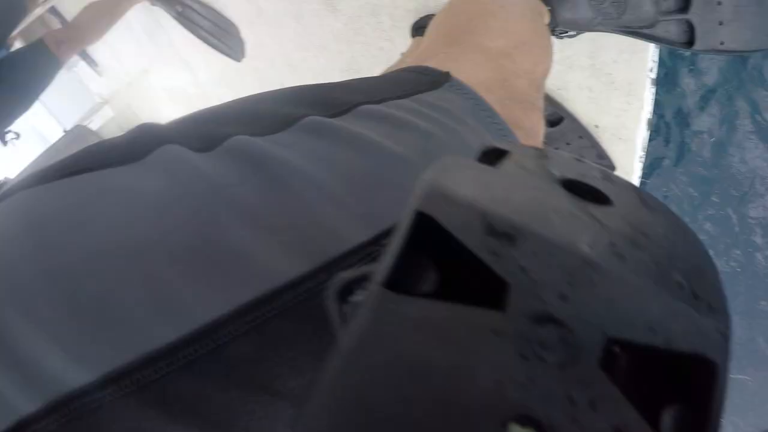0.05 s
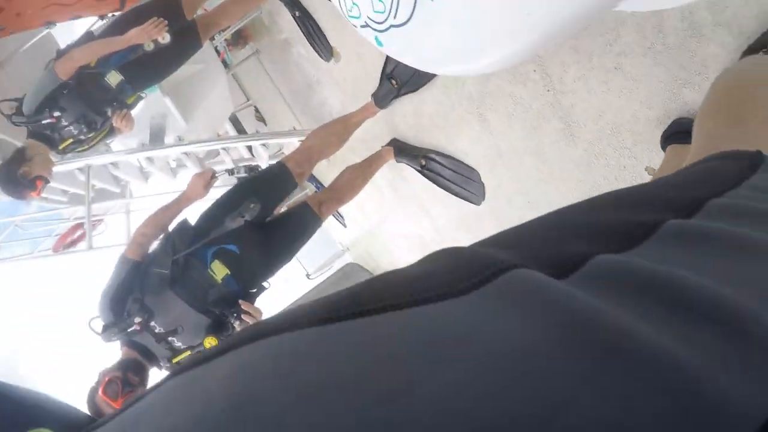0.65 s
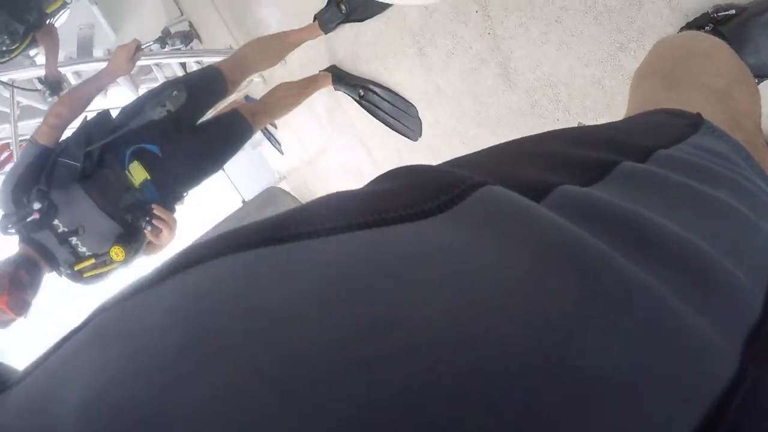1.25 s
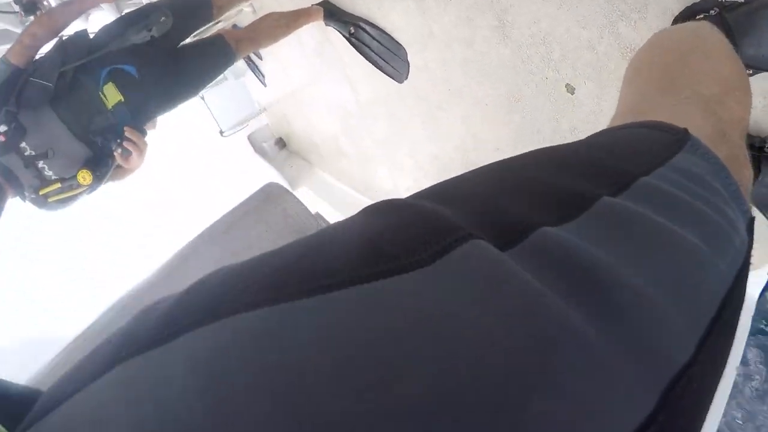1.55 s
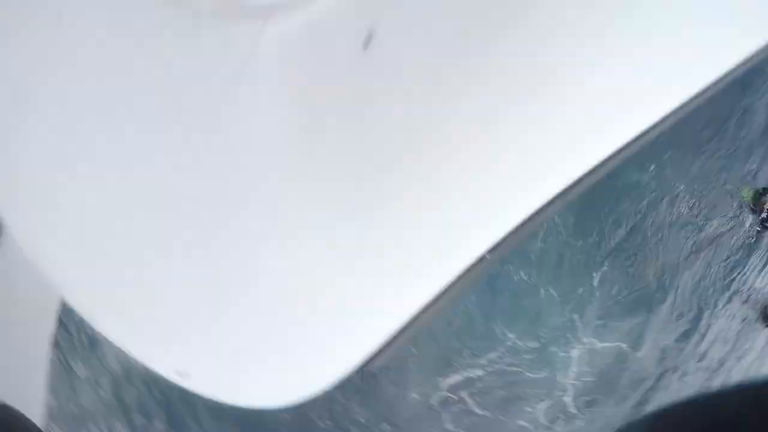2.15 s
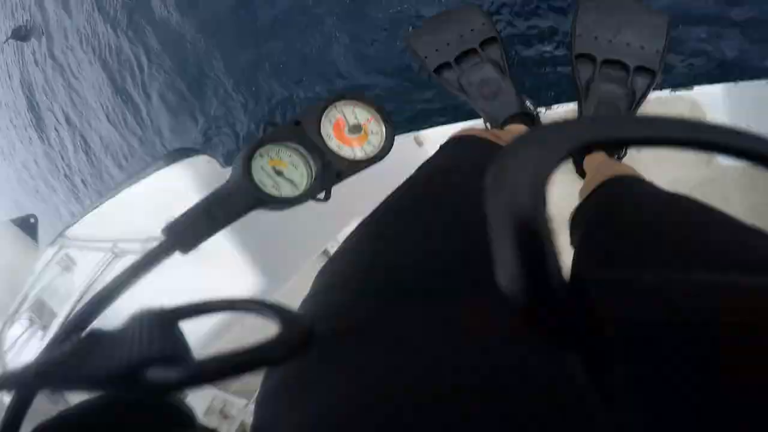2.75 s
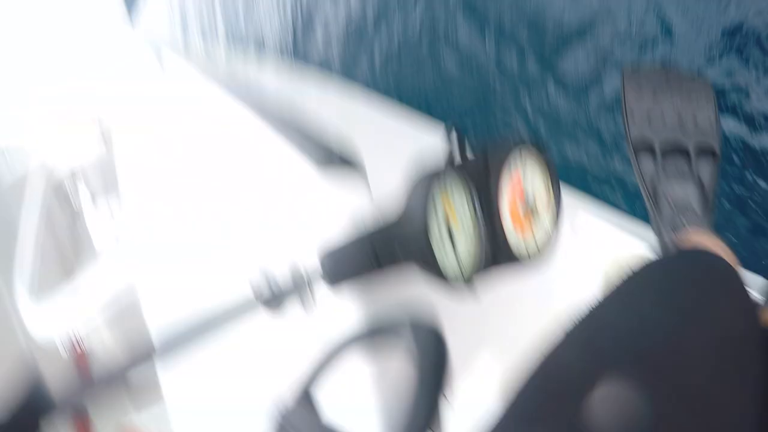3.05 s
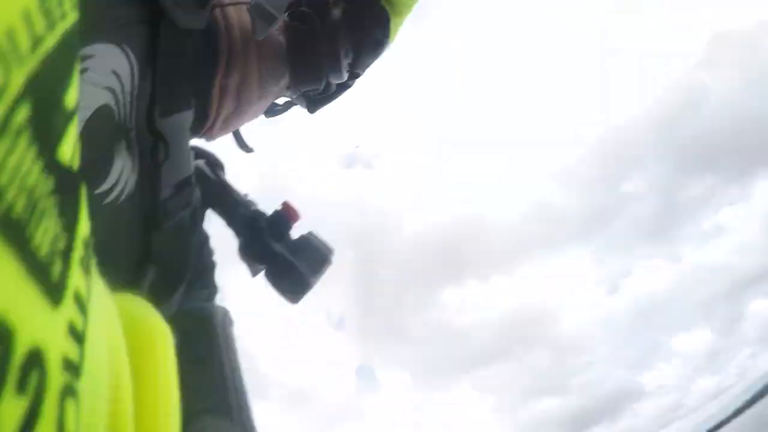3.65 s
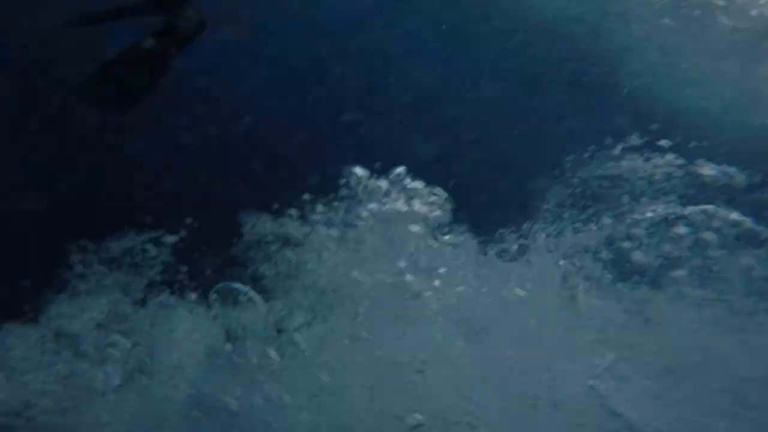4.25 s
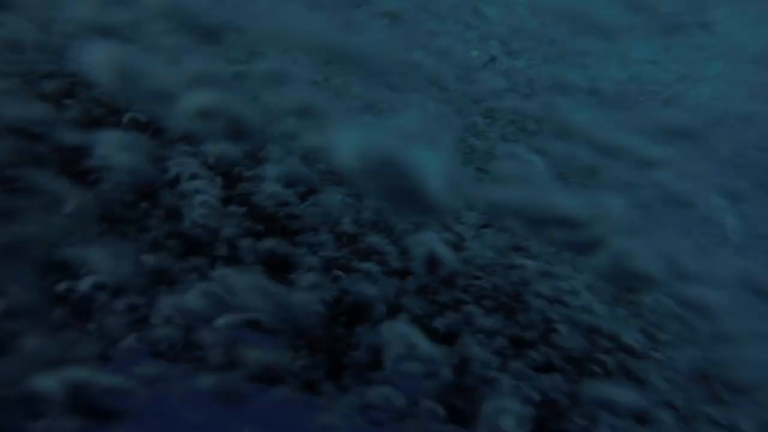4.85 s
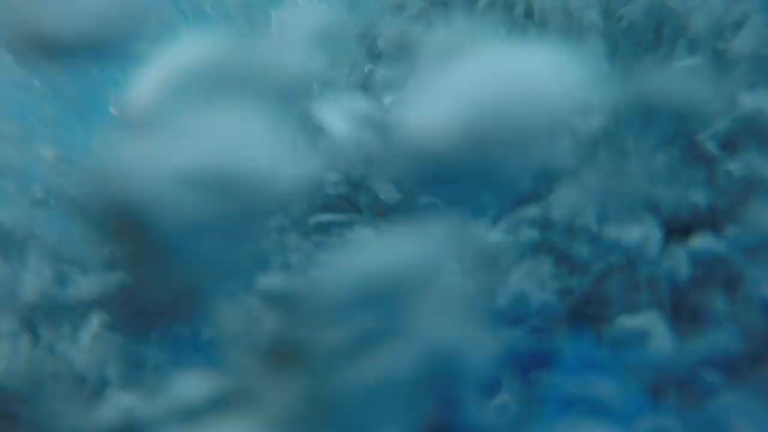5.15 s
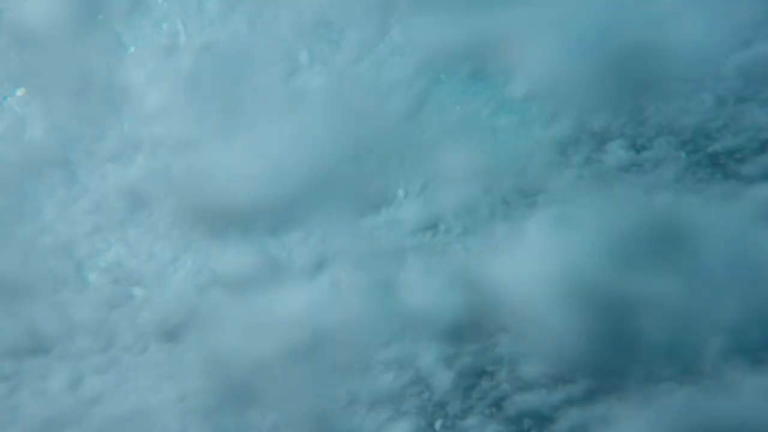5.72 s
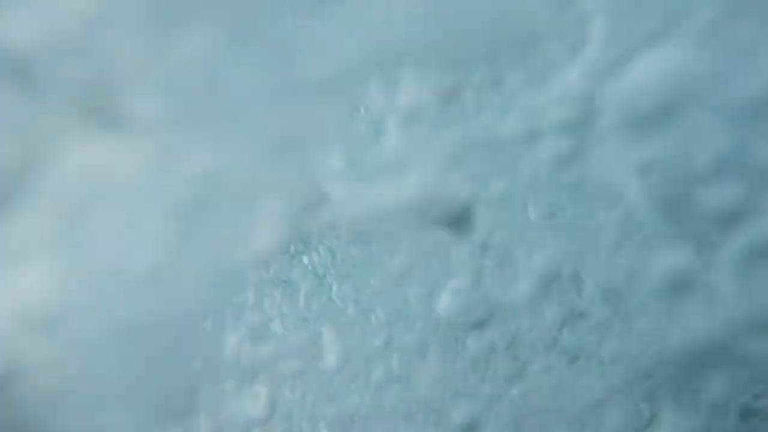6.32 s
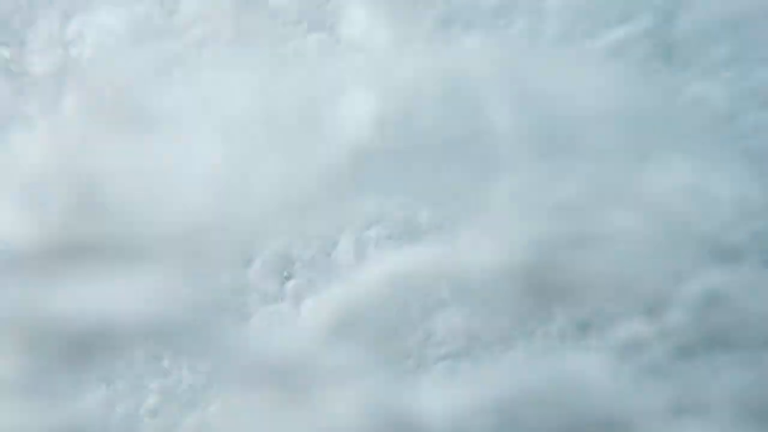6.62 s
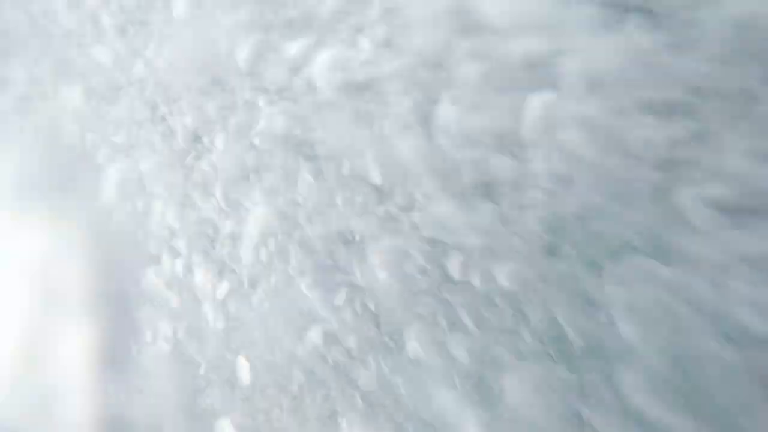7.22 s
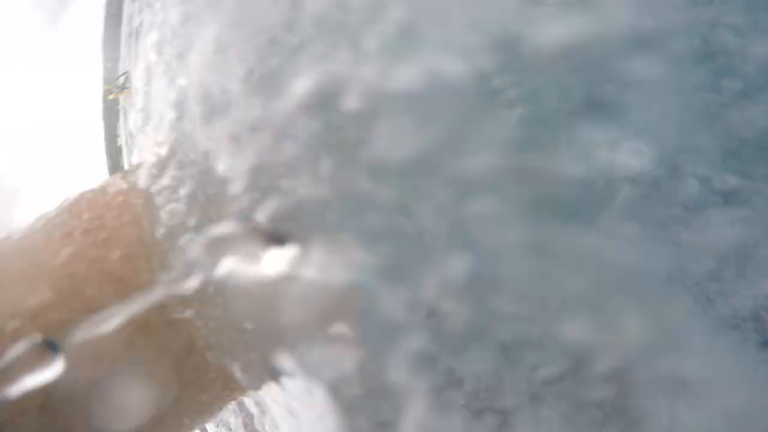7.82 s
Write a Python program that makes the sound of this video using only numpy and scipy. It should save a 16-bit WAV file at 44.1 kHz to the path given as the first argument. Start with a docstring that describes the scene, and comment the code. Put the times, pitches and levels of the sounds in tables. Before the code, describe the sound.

For the first 1.8 seconds, a wetsuit rubs against a camera's plastic housing in soft, hollow, hissing strokes that grow louder. From about 1.9 seconds, diving gear scuffs and knocks against it, with heavy low thumps around 2.1 and faint rustling in open air. More sharp clacks come irregularly from 2.7 seconds, with a brief skidding scrape near 3. At 3.9 seconds the camera slaps into the sea: a short splash, rapid knocks and deep thuds. The sound then turns muffled and quieter, a dull underwater churn with a few light clinks between 4.4 and 5 seconds. From about 5.1 seconds a dense cloud of air bubbles surrounds the housing, with low gurgles, glugs, bright plinks and fine fizz. It is strongest around 6.5 to 7.4 seconds and continues until the end near 8. Everything is very close, heard from inside the housing.

```python
"""Diver's camera entering the sea

A camera in a plastic housing rubs on a wetsuit, knocks against gear as the diver walks to the
boat's stern, then slaps into the water. Friction makes the hiss; blows ring the housing's modes.
Below the surface it is muffled, then a cloud of pulsating air bubbles churns and bursts around it."""
import sys
import numpy as np
from scipy import signal
from scipy.fft import rfft, irfft, next_fast_len
from scipy.io import wavfile
from scipy.ndimage import map_coordinates

SR = 44100
rng = np.random.default_rng(int(sys.argv[2]) if len(sys.argv) > 2 else 0)


def generate_wav(sig):
    """Save sig (samples, or channels by samples) to the path in sys.argv[1] as 16-bit PCM at SR."""
    pcm = np.round(np.clip(np.atleast_2d(sig).T, -1, 1) * 32767).astype(np.int16)
    wavfile.write(sys.argv[1], SR, pcm)


N = 347508
TIME = np.arange(N) / SR
STANDS_S, CONTACT_S, SUBMERGED_S, ENGULFED_S = 1.86, 3.906, 4.0, 5.13


def amp(db):
    """Decibels to gain."""
    return 10 ** (np.asarray(db) / 20)


def unit(x):
    """Scale to rms 1."""
    return x / np.sqrt(np.mean(x ** 2) + 1e-20)


def between(start_s, end_s, fade_s):
    """Gate with linear edges."""
    return np.clip(np.minimum(TIME - start_s, end_s - TIME) / fade_s + .5, 0, 1)


def dying(start_s, t60_s):
    """Full gain until start_s, then exponential decay."""
    return amp(-60 * np.clip((TIME - start_s) / t60_s, 0, 2))


def swells(rows):
    """Gain of bell-shaped (centre s, length s, dB) movements; powers add."""
    power = np.zeros(N)
    for centre_s, length_s, db in rows:
        near = slice(*np.searchsorted(TIME, [centre_s - 2 * length_s, centre_s + 2 * length_s]))
        power[near] += (amp(db) * np.exp(-(2 * (TIME[near] - centre_s) / length_s) ** 2)) ** 2
    return np.sqrt(power)


def wobble(rate_hz):
    """Smooth random curve, rate_hz knots a second."""
    return map_coordinates(rng.standard_normal(int(N * rate_hz / SR) + 4), [TIME * rate_hz])


def add(track, start_s, sound):
    """Mix a sound into a track."""
    part = track[round(start_s * SR):][:len(sound)]
    part += sound[:len(part)]


def filtered(x, response):
    """Apply a response given as a function of Hz."""
    size = next_fast_len(N + 8192)
    return irfft(rfft(x, size) * response(np.fft.rfftfreq(size, 1 / SR)), size)[:N]


def coloured(x, spectrum):
    """Shape by (Hz, dB) points, at rms 1."""
    points_hz, db = np.transpose(spectrum)
    return unit(filtered(x, lambda hz: amp(np.interp(np.log(hz + 1), np.log(points_hz), db))))


def noise(spectrum, grain_db=0, grain_hz=500):
    """Coloured noise, clumped by grain_db."""
    return coloured(rng.standard_normal(N) * amp(grain_db * wobble(grain_hz)), spectrum)


def resonant(x, modes):
    """Pass through (Hz, width Hz, dB) resonances, at rms 1."""
    def response(hz):
        return sum(amp(db) * 1j * hz * width_hz / (mode_hz ** 2 - hz ** 2 + 1j * hz * width_hz)
                   for mode_hz, width_hz, db in modes)
    return unit(filtered(x, response))


def ringing(modes, t, extra_db, detune):
    """One blow on (Hz, dB, t60 s) modes, at peak 1; the grip detunes them each time."""
    hz, db, t60_s = np.transpose(modes)
    hz = hz * (1 + detune * rng.standard_normal(len(hz)))
    gain = amp(db + extra_db + 2 * rng.standard_normal(len(hz))) * (-1) ** np.arange(len(hz))
    ring = gain @ (amp(-60 * t / t60_s[:, None]) * np.sin(2 * np.pi * hz[:, None] * t))
    return ring / np.abs(ring).max()


def scattered(x, share, t60_s):
    """Add brief random echoes from bubbles and the housing."""
    t = np.arange(SR // 40) / SR
    tail = rng.standard_normal(len(t)) * amp(-60 * t / t60_s)
    tail *= share / np.linalg.norm(tail)
    tail[0] += 1
    return signal.fftconvolve(x, tail)[:len(x)] / np.hypot(1, share)


def pulsation(cycle, life_cycles, rise, onset_cycles):
    """Damped sine of a bubble or thud: swells, glides up by rise, falls 60 dB in life_cycles."""
    wave = np.sin(2 * np.pi * cycle * (1 + rise * cycle / life_cycles))
    return wave * amp(-60 * cycle / life_cycles) * (1 - np.exp(-cycle / onset_cycles))


def swarm(per_s, pitch_hz, spread, life_cycles, size_db, samples):
    """Random bubbles at rms 1: log-normal pitches, many faint, a few strong."""
    when, size, damping = np.hsplit(rng.random((int(per_s * N / SR), 3)), 3)
    hz = np.clip(pitch_hz * np.exp(spread * rng.standard_normal(when.shape)), 60, 15000)
    strength = amp(size_db * np.minimum(-np.log(1 - size), 3.5))
    cycle = hz * np.arange(samples) / SR
    waves = strength * pulsation(cycle, life_cycles * (.5 + damping), rise=0.054, onset_cycles=0.66)
    at = (when * N).astype(int) + np.arange(samples)
    return unit(np.bincount(at.ravel(), waves.ravel(), N)[:N])


def around(**bubbles):
    """Six swarms around the housing, each heard by its own path."""
    return unit(sum(scattered(swarm(**bubbles), share=2.6, t60_s=0.0088) for _ in range(6)))


def deck_air():
    """Faint open air, and gear rustling as the diver shuffles to the stern."""
    # Air and rustle spectrum. Each row: frequency in Hz, density in dB.
    spectrum = [(76, -36), (130, -8), (162, -5.5), (194, -11.5), (418, -18.5), (720, -16.5), (1400, -27.5),
                (1610, -30.5), (2410, -23), (3300, -32.5), (4100, -27.5), (5100, -41.5), (6200, -37.5),
                (7600, -43), (12600, -52.5), (15100, -49.5), (16000, -78.5)]
    # Rustles. Each row: centre in seconds, length in seconds, level in dB.
    rustles = [(2.04, 0.32, -41.5), (2.3, 0.19, -48.5), (2.46, 0.067, -52), (2.56, 0.089, -46.5),
               (2.83, 0.21, -42), (3.14, .07, -57), (3.32, 0.15, -49), (3.53, 0.17, -52), (3.71, 0.22, -48),
               (3.85, 0.15, -45)]
    gain = np.hypot(swells(rustles), amp(-59.5))
    return gain * noise(spectrum, grain_db=4, grain_hz=120) * between(STANDS_S, SUBMERGED_S, 0.035)


def sway():
    """Slow pressure swings as the housing is shoved through air or water."""
    # Pressure spectrum. Each row: frequency in Hz, density in dB.
    spectrum = [(12, -4), (28, -4), (50, -6.5), (90, -11), (150, -18.5), (400, -48), (900, -110)]
    # Shoves. Each row: centre in seconds, length in seconds, level in dB.
    shoves = [(0.85, 0.036, -28), (1.02, 0.16, -44.5), (1.45, 0.21, -47.5), (1.73, 0.17, -39),
              (1.91, 0.13, -18.5), (2.06, 0.1, -11), (2.16, 0.023, -9), (2.2, .06, -25), (2.3, .12, -37),
              (2.6, 0.057, -29.5), (2.815, .08, -19.5), (2.92, 0.13, -37), (3.29, 0.048, -19.5),
              (3.375, 0.053, -23.5), (3.515, 0.054, -28.5), (3.63, 0.062, -23.5), (3.78, 0.16, -42),
              (4.04, 0.16, -11), (4.22, 0.15, -21), (4.71, 0.046, -19.5), (5.18, 0.032, -21),
              (6.3, .2, -24), (6.69, 0.056, -13), (6.98, .11, -13), (7.22, 0.089, -10.5),
              (7.36, 0.092, -19), (7.71, 0.2, -21.5)]
    seated_db, walking_db, adrift_db = -63, -45.5, -29.5
    rest_db = np.select([TIME < STANDS_S, TIME < CONTACT_S], [seated_db, walking_db], adrift_db)
    return np.hypot(swells(shoves), amp(rest_db)) * noise(spectrum)


def wetsuit():
    """Neoprene hisses over the housing and stirs the hollow between them; each stroke resizes it."""
    # Broad housing resonances under the suit. Each row: frequency in Hz, density in dB.
    spectrum = [(230, -5), (330, 2.5), (510, 3.5), (700, -5.5), (1000, -3), (1350, -7), (1800, 0),
                (2300, -12.5), (3100, -9.5), (4000, -6.5), (5100, -20.5), (7200, -17), (9000, -28),
                (13000, -28.5), (16000, -38)]
    # Strokes. Each row: centre and length in seconds, hiss and hollow in dB, hollow pitch in Hz.
    strokes = [(0.07, 0.14, -56, -73, 221), (0.333, 0.13, -52.5, -44.5, 220.3),
               (0.401, 0.035, -62, -40.5, 230.5), (0.48, 0.083, -52.5, -43, 229.6),
               (0.695, .14, -41, -31.5, 238), (0.876, 0.068, -37, -41, 202.3),
               (1.036, 0.12, -44.5, -37.5, 188.8), (1.19, 0.11, -52, -45.5, 217),
               (1.306, 0.099, -50, -58, 240.4), (1.39, 0.065, -43.5, -39.5, 255.6),
               (1.552, 0.14, -42, -33, 223.5), (1.702, 0.14, -29, -31, 245),
               (1.799, 0.073, -25.5, -32, 227)]
    creep_hiss_db, creep_hollow_db = -69, -62  # the suit never lies quite still
    centre_s, length_s, hiss_db, hollow_db, hollow_hz = np.transpose(strokes)
    phase = 2 * np.pi * np.cumsum(np.interp(TIME, centre_s, hollow_hz)) / SR
    flutter = lambda: unit(filtered(rng.standard_normal(N), lambda hz: 1 / (1 + (hz / 44) ** 3)))
    hollow = flutter() * np.cos(phase) + flutter() * np.sin(phase)
    hiss = scattered(noise(spectrum, grain_db=2.5), share=0.4, t60_s=0.014)
    hiss_gain = np.hypot(swells(zip(centre_s, length_s, hiss_db)), amp(creep_hiss_db))
    hollow_gain = np.hypot(swells(zip(centre_s, length_s, hollow_db)), amp(creep_hollow_db))
    return (hiss_gain * hiss + hollow_gain * hollow) * between(-1, STANDS_S, 0.016)


def scuffs():
    """Short gritty drags over the gear shake the housing."""
    # Friction spectrum. Each row: frequency in Hz, density in dB.
    spectrum = [(240, -34.5), (400, -1.5), (964, -3), (1530, -8), (1870, -1.5), (3210, -15.5), (3750, -10),
                (8630, -30), (12500, -36), (16000, -55.5)]
    # Drags. Each row: start in seconds, length in seconds, grit in dB, shudder in dB.
    drags = [(0.839, 0.071, -39.5, -42), (1.835, 0.055, -22.5, -19), (1.863, 0.02, -12.5, -15.5),
             (1.98, 0.15, -28.5, -20.5), (2.034, 0.026, -18.5, -17.5), (2.205, 0.0095, -42, -34),
             (2.234, 0.01, -51, -43), (2.297, 0.017, -53, -46), (2.452, .04, -61, -42.5),
             (2.329, 0.025, -44.5, -52), (2.59, 0.047, -52, -36.5), (2.759, 0.03, -36, -41.5),
             (3.284, 0.018, -40.5, -25.5), (3.488, 0.029, -46.5, -52), (3.612, 0.022, -49, -39.5)]
    grit = noise(spectrum, grain_db=3.5)
    shudder = noise([(30, -14), (70, -15), (220, 5.5), (400, -8), (800, -18), (2000, -81.5)])
    return sum(between(at_s, at_s + length_s, 0.002) * (amp(grit_db) * grit + amp(shudder_db) * shudder)
               for at_s, length_s, grit_db, shudder_db in drags)


def skid():
    """A buckle skids over the housing: stick and slip drives a few modes, hardest at the first bite."""
    start_s, length_s, slide_db, bite_db = 2.952, 0.039, -25.5, -15.5
    # Driven modes. Each row: frequency in Hz, width in Hz, gain in dB.
    modes = [(861, 250, -5), (2385, 69, 4.5), (2800, 120, -14), (3550, 174, -13.5),
             (4100, 140, -12.5), (6470, 630, -24)]
    slips = noise([(300, 0), (2500, 0), (6000, -4), (15000, -12.5)], grain_db=4, grain_hz=1400)
    pressure = np.hypot(amp(slide_db), amp(bite_db) * dying(start_s, t60_s=.04))
    return pressure * resonant(slips, modes) * between(start_s, start_s + length_s, .005)


def knocks():
    """Blows crack, thud and ring the housing, favouring modes near the contact pitch."""
    # Housing modes. Each row: frequency in Hz, gain in dB, t60 in seconds.
    modes = [(444.4, -0.5, 0.014), (648, -1.5, .02), (940, 3, 0.012), (1342, -1.5, 0.009),
             (1856, -1.5, 0.012), (1840, -31.5, .08), (2358, -1.5, 0.013), (3030, -6.5, 0.014),
             (3343, -5, 0.01), (4110, -2, 0.011), (5280, -5, .005), (6710, -4.5, 0.0033)]
    # Blows. Each row: start in seconds, relative level in dB, contact in Hz, thud and treble in dB.
    blows = [(1.883, -8, 1634, 5, -18), (1.977, -1, 830, 0.5, -50), (2.003, -9, 1690, -13, -28),
             (2.037, -4.5, 926, -20, -27), (2.148, 9, 1086, -4.5, -7.5), (2.523, -35, 3330, 1, -6),
             (2.591, -24.5, 799, -17, -47), (2.625, -30, 708, -12, -56), (2.719, -11.5, 2570, -17, -26),
             (2.805, 8, 1720, -33, -10), (2.878, 0, 3270, -24, -18), (2.941, 5.5, 2570, -34.5, -10.5),
             (3.006, -5.5, 2560, -41, -10.5), (3.09, -35.5, 698, 5, -60), (3.274, -25.5, 957, -3, -45.5),
             (3.332, 1.5, 895, -37, -9.5), (3.358, 7, 1760, -19.5, -18), (3.388, -3.5, 4300, -38, -22),
             (3.609, -30.5, 915, 3.5, -7), (3.764, 5, 1510, -24.5, -32), (3.799, -11.5, 2440, -24, -43),
             (3.868, -4, 2330, -41, -25), (3.909, -1, 1760, -33, -14), (3.935, -11.5, 2240, -7, 7),
             (3.962, -3.5, 3460, -4, -2), (3.986, -3.5, 1900, -8, -6), (4.012, -8, 1850, -7, -35),
             (4.044, 2.5, 790, -14, -16.5), (4.097, 0, 1760, -12, -23)]
    out, t = np.zeros(N), np.arange(SR // 8) / SR
    hz = np.transpose(modes)[0]
    for start_s, db, contact_hz, thud_db, treble_db in blows:
        favour_db = 8 * np.exp(-(np.log(hz / contact_hz) / 0.31) ** 2)
        body_db = 0.094 * thud_db * (hz < 1200)
        hardness_db = 0.4 * (treble_db + 17) * np.maximum(np.log2(hz / 2000), 0)
        ring = ringing(modes, t, favour_db + body_db + hardness_db, detune=.035)
        ring = scattered(ring, share=.4, t60_s=.012)
        crack = amp(treble_db - 4 - 60 * t / 0.0043) * rng.standard_normal(len(t))
        thud = amp(thud_db + 0.5) * pulsation(190 * t, life_cycles=5.3, rise=0, onset_cycles=0.064)
        add(out, start_s + .001, amp(db + 1.5) * (ring + crack + thud))  # 1 ms after the listed start
    return out


def heaves():
    """Heavy blows move the whole housing for a few low cycles."""
    # Blows. Each row: start in seconds, relative level in dB, pitch in Hz.
    blows = [(1.885, -9, 300), (1.964, -9, 324), (1.981, 0.5, 133), (2.1521, 6, 156), (2.802, -7.5, 44.7),
             (3.614, -16.5, 45.2), (4.0485, 3.5, 80), (4.101, 3.5, 84)]
    out, t = np.zeros(N), np.arange(SR // 8) / SR
    for start_s, db, hz in blows:
        add(out, start_s, amp(db + 5) * pulsation(hz * t, life_cycles=2.55, rise=0, onset_cycles=0.12))
    return out


def clinks():
    """Gear taps the submerged housing."""
    # Modes the water leaves ringing. Each row: frequency in Hz, gain in dB, t60 in seconds.
    modes = [(1790, -11.5, 0.015), (2440, -4, 0.01), (3100, 0.5, 0.011), (3560, -1, 0.0094),
             (3870, -3.5, 0.007), (4600, -20, .01), (6600, -23, 0.005)]
    # Taps. Each row: start in seconds, level in dB.
    taps = [(4.4385, -3), (4.458, -15), (4.782, -17.5), (4.9551, -4)]
    out, t = np.zeros(N), np.arange(SR // 8) / SR
    attack = 1 - np.exp(-t / 0.00013)
    for start_s, db in taps:
        add(out, start_s, amp(db) * ringing(modes, t, extra_db=0, detune=0.045) * attack)
    return out


def splash():
    """Drops spatter the housing until it is under; their foam fades more slowly."""
    # Spray spectrum. Each row: frequency in Hz, density in dB.
    spectrum = [(240, -11), (400, -7), (994, -5.5), (1250, -11.5), (1930, -1.5), (2840, -4.5), (3640, -6.5),
                (5270, -12.5), (13500, -27.5), (15300, -32), (16000, -46)]
    spray = amp(-18) * dying(SUBMERGED_S, t60_s=0.15)
    foam = amp(-32.5) * dying(SUBMERGED_S, t60_s=1.55)
    return (spray + foam) * noise(spectrum, grain_db=5, grain_hz=610) * between(CONTACT_S, 4.6, 0.0045)


def large_bubbles():
    """Large bubbles gurgle over a distant churn; the gurgle is dull until the cloud arrives."""
    # Housing response to large bubbles. Each row: frequency in Hz, gain in dB.
    response = [(35, -33), (60, -5.5), (82, -0.5), (152, -10.5), (296, -2), (470, -1), (649, 3.5), (738, 0),
                (907, -3.5), (1300, -1.5), (1690, -53), (2860, -120)]
    far_cutoff_hz = 760
    bubbles = swarm(per_s=750, pitch_hz=316, spread=0.697, life_cycles=9.8, size_db=4, samples=1800)
    near = coloured(bubbles, response)
    far = filtered(near, lambda hz: 1 / np.sqrt(1 + (hz / far_cutoff_hz) ** 10))
    engulfed = between(ENGULFED_S, 9, 0.11)
    gurgle = engulfed * near + (1 - engulfed) * far
    churn = noise([(40, -4), (85, 8.5), (140, 4), (220, 3.5), (420, -3), (640, 1.5), (850, -9.5),
                   (1400, -38), (4000, -100)], grain_db=3, grain_hz=40)
    return amp(2.5) * gurgle + amp(-2) * churn


def small_bubbles():
    """Small bubbles chirp in clusters; countless others blur into froth."""
    # Froth spectrum. Each row: frequency in Hz, density in dB.
    spectrum = [(500, -33), (900, 8.5), (1300, 0), (1800, 6.5), (2500, 0.5), (3300, -11), (5000, -17),
                (9000, -40), (15000, -51)]
    clusters = unit(amp(2.55 * wobble(45)))
    chirps = around(per_s=55, pitch_hz=2009, spread=0.421, life_cycles=23.4, size_db=5, samples=700)
    froth = noise(spectrum, grain_db=5, grain_hz=220)
    return clusters * (amp(2) * chirps + amp(-1) * froth)


def fizz():
    """The finest bubbles ping, hiss and tick, with brief echoes."""
    # Housing response to ticks. Each row: frequency in Hz, gain in dB.
    response = [(2500, -57), (4000, 12), (6000, 1.5), (9000, -3), (15000, -1)]
    pings = around(per_s=20, pitch_hz=5600, spread=.42, life_cycles=22, size_db=7.5, samples=400)
    mist = noise([(3000, -42), (5500, -3.5), (9000, -3.5), (15000, -5)], grain_db=6.5, grain_hz=320)
    tick_swarms = (swarm(per_s=40, pitch_hz=9000, spread=.4, life_cycles=6, size_db=9.5, samples=100)
                   for _ in range(4))
    ticks = sum(scattered(tick_swarm, share=0.8, t60_s=0.0026) for tick_swarm in tick_swarms)
    return amp(-1.5) * pings + amp(4.5) * coloured(ticks, response) + amp(-10) * mist


def cloud():
    """Bubbles of three sizes surround the housing; puffs of fine foam sweep over it."""
    # Cloud strength. Each row: time in seconds, large and small bubbles in relative dB.
    levels = [(4.12, -29, -36.5), (4.42, -39.5, -48), (4.8, -33.5, -43.5), (5.15, -31.5, -40.5),
              (5.36, -21.5, -38), (5.55, -27, -38), (6.25, -26, -47), (6.45, -23, -40.5), (6.8, -21, -38.5),
              (7.0, -22.5, -32), (7.3, -22, -30.5), (7.53, -35, -35.5), (7.88, -34.5, -34.5)]
    # Foam puffs. Each row: centre and length in seconds, small bubbles and fizz in relative dB.
    puffs = [(5.264, 0.11, -26.5, -42.5), (5.364, .11, -24.5, -42.5), (5.57, 0.057, -50, -42),
             (5.89, 0.046, -54, -47.5), (6.41, 0.27, -42.5, -51), (7.194, 0.097, -31, -43),
             (7.667, 0.31, -28.5, -45.5)]
    fizz_db_per_db, lull_db = 0.54, -8
    times_s, *columns = np.transpose(levels)
    large_db, small_db = (np.interp(TIME, times_s, db) for db in columns)
    centre_s, length_s, puff_small_db, puff_fizz_db = np.transpose(puffs)
    excess_db = small_db - small_db[TIME > SUBMERGED_S].mean()
    fizz_db = -56 + fizz_db_per_db * excess_db + lull_db * (TIME < ENGULFED_S)
    small_gain = np.hypot(amp(small_db), swells(zip(centre_s, length_s, puff_small_db)))
    fizz_gain = np.hypot(amp(fizz_db), swells(zip(centre_s, length_s, puff_fizz_db)))
    bubbles = amp(large_db) * large_bubbles() + small_gain * small_bubbles() + fizz_gain * fizz()
    return bubbles * between(3.97, 9, 0.045)


def glugs():
    """Large bubbles pinch off close by with a tick and ring briefly."""
    # Close bubbles. Each row: start in seconds, relative level in dB, initial pitch in Hz.
    bubbles = [(4.571, -18, 239), (4.697, -20.5, 198), (5.054, -20, 398), (5.162, -17.5, 128),
               (5.325, -12.5, 570), (5.361, -17, 510), (5.441, -14, 560), (5.517, -11, 558),
               (5.962, -19, 630), (6.106, -13, 670), (6.327, -14.5, 620), (6.403, -10.5, 516),
               (6.529, -9.5, 477), (6.579, -3.5, 426), (6.658, -7, 517), (6.674, -5, 610), (6.809, -8, 527),
               (6.83, -9, 597), (6.902, -10, 427), (6.975, -7, 790), (6.988, -6.5, 800), (7.006, -6, 1000),
               (7.03, -11.5, 485), (7.088, -6, 404), (7.12, -16, 780), (7.264, -3, 542), (7.307, -11, 420),
               (7.458, -11, 614), (7.678, -9, 830), (7.714, -12, 1040), (7.809, -6, 900),
               (7.838, -8.5, 1010)]
    out, t = np.zeros(N), np.arange(SR // 20) / SR
    for start_s, db, hz in bubbles:
        tick = amp(-37 - 60 * t / .008) * signal.lfilter([.5], [1, -.6], rng.standard_normal(len(t)))
        ring = pulsation(hz * t, life_cycles=15.9, rise=0.034, onset_cycles=0.38)
        add(out, start_s, amp(db + 6) * (ring + tick))
    return out


def plinks():
    """Small bubbles burst and spatter against the housing."""
    # Bursts. Each row: start in seconds, relative level in dB, initial pitch in Hz.
    bursts = [(5.232, -15, 2140), (5.275, -19, 1860), (5.309, -10, 4050), (5.352, -11, 1860),
              (5.623, -15, 3360), (5.921, -14, 2010), (5.925, -21, 5200), (5.963, -8, 1500),
              (5.994, -14, 1880), (6.214, -14.5, 3940), (6.277, -12, 1850), (6.291, -15.5, 2280),
              (6.503, -7.5, 3400), (6.5812, -5, 1054), (6.640, -12, 1750), (6.676, -9.5, 1260),
              (6.684, -14.5, 2360), (6.703, -9, 1650), (6.724, -5.5, 2480), (6.7248, -18.5, 5730),
              (6.902, -2.5, 2220), (6.978, -8, 1530), (7.033, -8, 4100), (7.049, -7, 2320),
              (7.153, -12, 4530), (7.217, -6.5, 2250), (7.218, -5.5, 8340), (7.379, -1.5, 2090),
              (7.569, -4, 1850), (7.57, -6, 3500), (7.62, -5, 2820), (7.697, -6, 2620), (7.774, -5, 1820)]
    out, t = np.zeros(N), np.arange(SR // 20) / SR
    for start_s, db, hz in bursts:
        ring = pulsation(hz * t, life_cycles=13.6, rise=0.081, onset_cycles=0.34)
        add(out, start_s, amp(db + 4.5) * scattered(ring, share=0.85, t60_s=0.022))
    return out


def scene():
    """Everything reaches one microphone inside the housing."""
    handling = wetsuit() + deck_air() + sway() + scuffs() + knocks() + heaves() + clinks() + skid()
    water = splash() + cloud() + glugs() + plinks()
    return (handling + water)[None]


def record(dry):
    """The hardest blows overload the microphone; the camera cuts the top of the band."""
    top_hz = 15500
    clipped = dry[0] / (1 + np.abs(dry[0]) ** 8) ** (1 / 8)
    return filtered(clipped, lambda hz: 1 / np.sqrt(1 + (hz / top_hz) ** 200))[None]


dry = scene()
out = record(dry)
generate_wav(out)
```